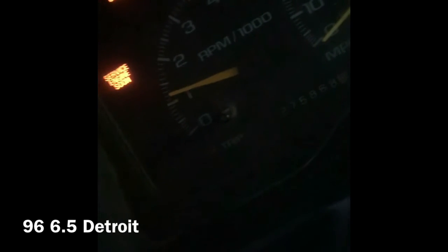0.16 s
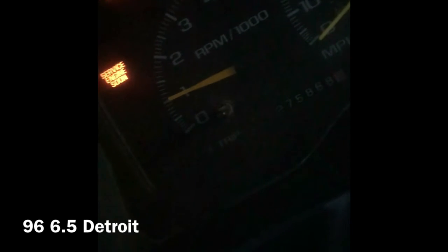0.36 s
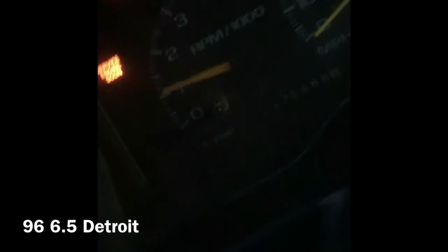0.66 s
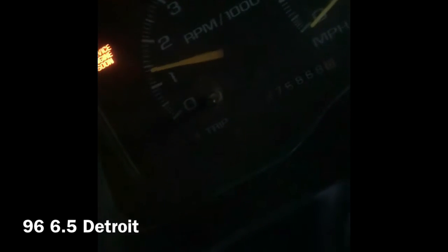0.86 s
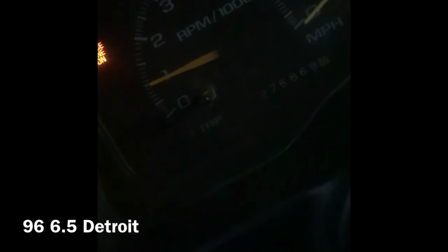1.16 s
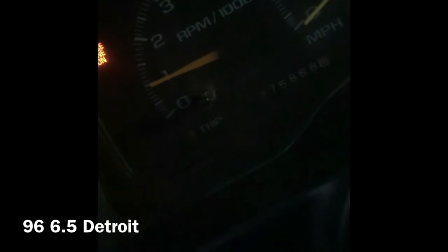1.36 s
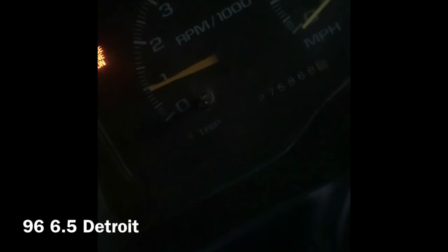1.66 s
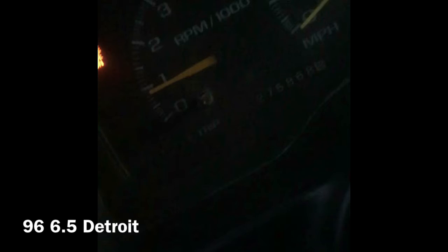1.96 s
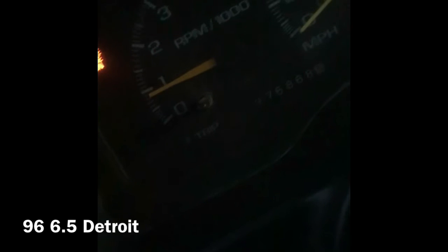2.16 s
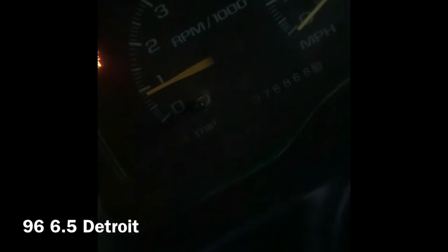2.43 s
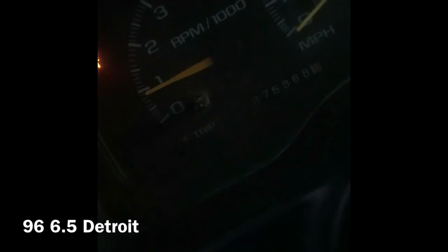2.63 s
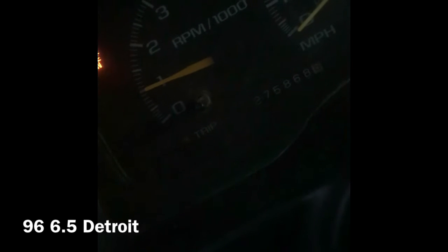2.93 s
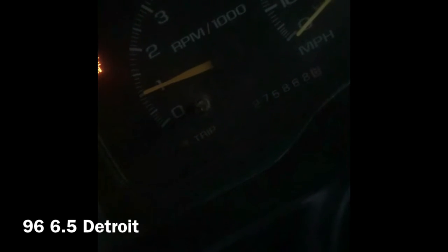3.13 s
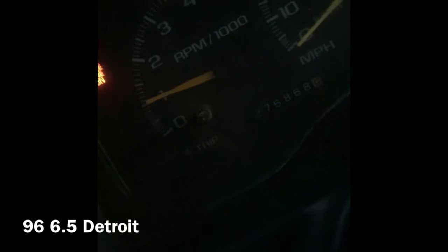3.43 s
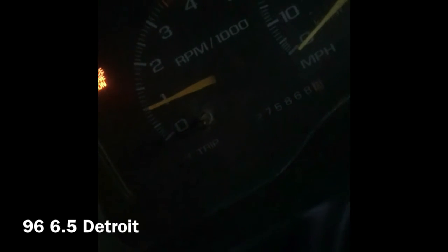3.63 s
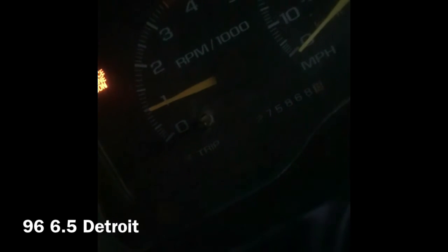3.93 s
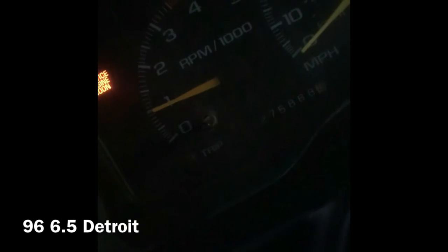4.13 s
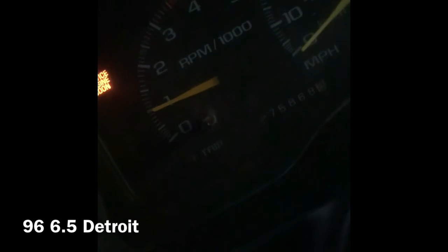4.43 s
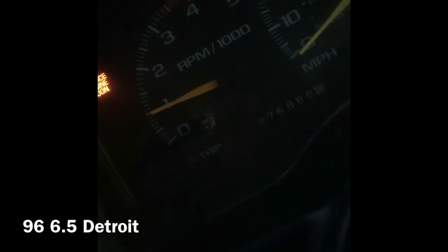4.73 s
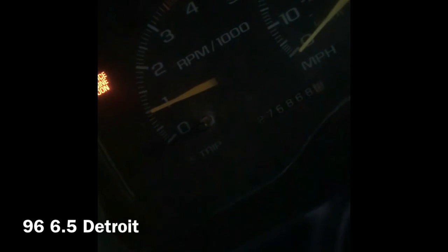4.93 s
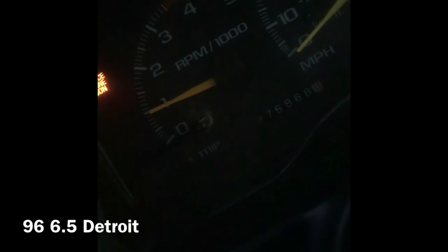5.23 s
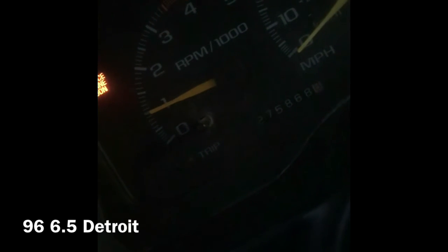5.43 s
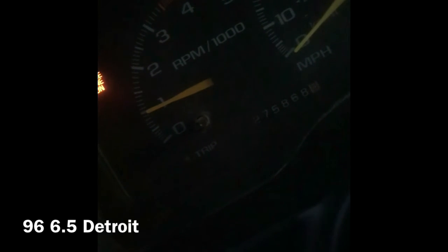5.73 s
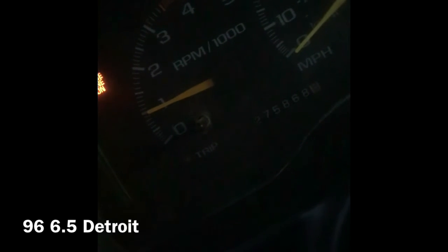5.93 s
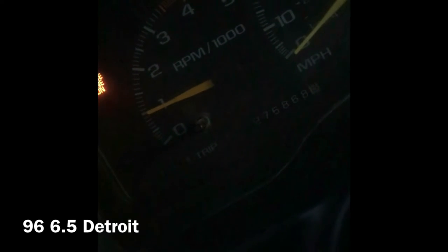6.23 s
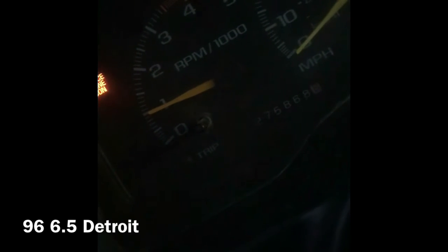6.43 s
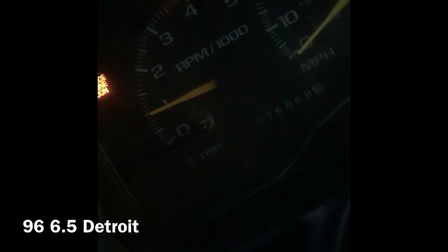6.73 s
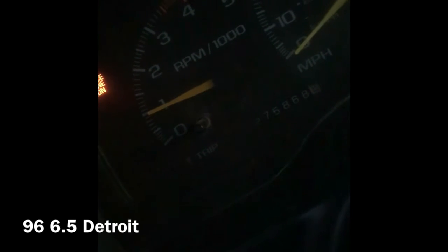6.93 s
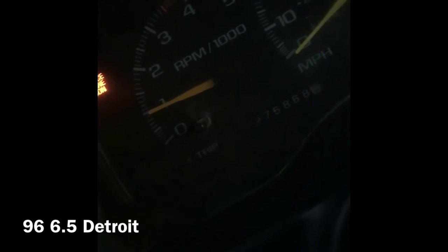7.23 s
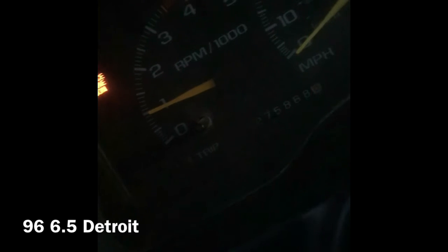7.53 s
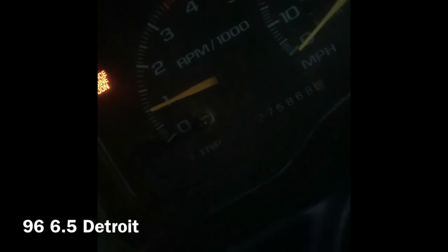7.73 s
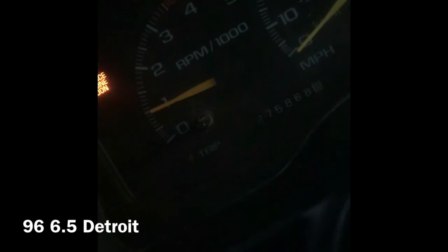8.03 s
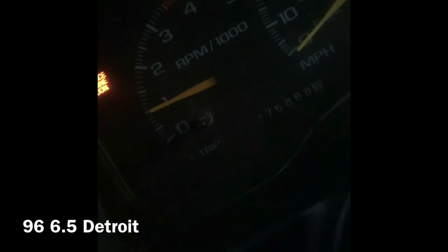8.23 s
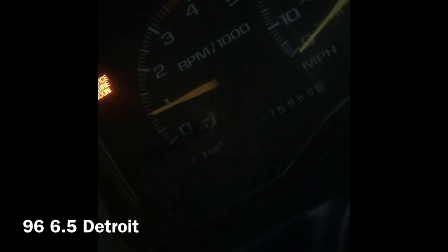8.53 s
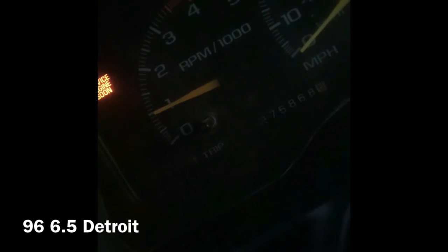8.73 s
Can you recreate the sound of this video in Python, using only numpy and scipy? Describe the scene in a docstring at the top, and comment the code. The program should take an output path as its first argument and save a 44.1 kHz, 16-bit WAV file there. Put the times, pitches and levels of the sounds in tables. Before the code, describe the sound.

Inside a truck cab, a just-started diesel stumbles and shudders, with a few metal clinks, before evening out into a booming, rhythmic idle.

```python
"""Cold V8 diesel, from the cab

The engine has just caught: it lopes, shudders, hunts for its speed and settles near 950 rpm.
Its low firing orders boom in the truck's cab over a loose rumble, and the same round of thuds, knocks
and ticks comes through the bulkhead every two turns. Dash trim buzzes with the shaking. Early on
a catch ratchets and loose metal clinks nearby. A faint hiss lies under it all."""
import sys
import numpy as np
from scipy import signal
from scipy.fft import rfft, irfft, next_fast_len
from scipy.io import wavfile
from scipy.ndimage import uniform_filter1d

SR = 44100
rng = np.random.default_rng(int(sys.argv[2]) if len(sys.argv) > 2 else 0)


def wav_out(sig):
    """Save sig, one row per channel (or a flat mono array), as 16-bit PCM at SR to the path in sys.argv[1]."""
    wavfile.write(sys.argv[1], SR, np.round(np.clip(np.atleast_2d(sig).T, -1, 1) * 32767).astype(np.int16))


N = 391166
TIME = np.arange(N) / SR

# faint hiss, up at the start and once more midway: t/s, level/dB
HISS_FADER = [(0, -65.5), (1.33, -64.5), (1.38, -73), (2.8, -76), (2.84, -64.5), (4.52, -65), (4.57, -74.5),
              (8.87, -74)]
# teeth of the ratcheting catch: t/s, level/dB
RATCHET_TEETH = [(.253, -17), (.275, -19), (0.292, -16), (0.308, -17.5), (.325, -18.5)]
# tone of a tooth: f/Hz, relative level/dB
TOOTH_EQ = [(250, -11), (600, 6), (950, 5.5), (1200, -16), (1650, 5.5), (2150, -13.5), (2950, 5), (3500, 0),
            (4200, -11), (7000, -18.5), (15500, -27.5)]
# touches of loose metal: t/s, ring level/dB, snap level/dB, tilt toward the high modes/(dB per kHz)
CLINK_HITS = [(0.575, -43, -25, 0), (0.657, -30, -22.5, 6), (.666, -27.5, -19, 6), (.704, -34, -22, 13),
              (0.916, -34, -35, 19), (1.025, -49, -39, 12), (1.037, -30.5, -33.5, 16),
              (1.091, -26, -19.5, -2), (1.097, -26, -19, -2), (4.991, -40, -42, 2)]
# modes of that metal: f/Hz, width/Hz, gain/dB
CLINK_MODES = [(2650, 70, -7), (2920, 35, 9.5), (3150, 39, 10.5), (3262, 30, 15), (3420, 90, 2),
               (3720, 160, -7), (4100, 200, -20)]
# tone of a clink's snap: f/Hz, relative level/dB
SNAP_EQ = [(200, -1), (500, 1), (1100, -5), (1700, -5), (2100, -13), (3200, -1.5), (4400, -24),
           (6000, -25.5), (8000, -41), (15500, -46)]
# the dash trim works loose and buzzes louder: start/s, end/s, boost/dB
LOOSE_TRIM_SPELLS = [(1.63, 1.86, 3), (2.36, 2.8, 8.5), (3.48, 3.66, 7), (4.0, 4.48, 6.5),
                     (4.98, 5.34, 10.5), (6.72, 7.24, 6.5), (7.74, 7.86, 9), (8.24, 8.36, 8)]
# swells of cab resonance: t/s, f/Hz, peak level/dB, rise/s, fall/s
CAB_SHUDDERS = [(.122, 50, -16, .03, 0.028), (0.237, 59.6, -2.5, 0.016, 0.03),
                (0.775, 124, -17, .02, 0.034), (.778, 216, -26, .025, .03), (0.803, 58.9, -6, 0.047, 0.13),
                (0.859, 170.5, -14, 0.022, 0.028), (0.957, 178, -19, 0.058, 0.038),
                (2.534, 54.3, -13, 0.023, 0.045), (2.897, 63, -13, 0.031, 0.059),
                (3.21, 50, -19, 0.028, 0.013), (3.322, 51, -13.5, 0.028, 0.013),
                (3.836, 60, -18, 0.014, 0.014)]
# tone of the rumble: f/Hz, relative level/dB
RUMBLE_EQ = [(20, -37), (36, -26.5), (47, -1.5), (57, 1), (75, 0), (105, -4), (145, -8.5), (168, -11),
             (205, -9.5), (250, -17), (400, -29.5), (800, -79.5)]

# crank speed: t/s, speed/rpm
CRANK_SPEED = [(0.0, 972.0), (0.3, 846.9), (0.6, 940.0), (1.1, 946.6), (1.6, 891.0), (2.05, 783.9),
               (2.35, 806.1), (2.7, 896.1), (3.0, 1032.6), (3.4, 1069.4), (3.7, 945.2), (4.1, 965.4),
               (5.0, 959.8), (5.8, 962.3), (6.2, 950.0), (6.9, 958.0), (7.4, 952.1), (8.87, 954.9)]
# the engine flares as the cylinders catch: start/s, end/s, strength (0-1)
FLARE_SPELLS = [(.07, .205, 1), (.505, .875, 0.67)]
# it misses and coasts: start/s, end/s, strength (0-1)
MISFIRE_SPELLS = [(.208, .25, 0.2), (.355, .47, 0.53), (.915, 1.085, 0.96), (1.16, 1.215, 0.47),
                  (1.44, 1.6, 0.22), (1.7, 1.75, 0.26), (1.84, 1.9, 0.4), (3.53, 3.69, 0.2)]
# the hardest firings: t/s, clatter boost/dB
BANGS = [(.095, -1.5), (.79, 2), (1.26, 8), (1.381, 2), (1.668, 1.5), (1.803, 1.5), (2.25, 2.5), (2.4, 2),
         (2.549, 4.5), (2.94, 1), (3.265, 1.5), (3.755, 3.5), (4.075, 2), (4.13, 4.5), (4.25, 1.5)]
# the eight cylinders in firing order: thud level/dB, knock level/dB, tick level/dB
CYLINDER_MIX = [(-5, -2.5, -2), (-5.5, -0.5, -4.5), (-7, -5.5, -3.5), (-5, -3, -3.5), (-8, -6.5, -3.5),
                (-7.5, -4, -3), (-9, -7, -5), (-7, -3.5, -6.5)]
# each cylinder's injector click, combustion and valve closing: crank angle/deg, level/dB
CYLINDER_HITS = [(-22, -5), (5, -3), (30, -3.5)]
# low, mid and high registers of an impact through the bulkhead: f/Hz, relative level/dB
THUD_EQ = [(100, -27), (170, -10), (210, -7), (270, -6.5), (380, -6), (470, -8.5), (540, -12.5), (700, -14),
           (1000, -39.5), (2000, -76.5)]
KNOCK_EQ = [(300, -26.5), (600, -4.5), (740, -5), (810, 2), (1000, 0), (1080, -2), (1140, 0.5),
            (1310, -1.5), (1480, -10.5), (1800, -20.5), (2600, -32.5), (5000, -75.5)]
TICK_EQ = [(700, -37), (1300, 4), (1700, 5.5), (2040, -0.5), (2250, 2.5), (2500, 2), (2850, 1.5),
           (3250, 0.5), (3550, -8), (4000, -19), (5000, -27.5), (6200, -30), (8000, -55.5), (16000, -60)]
# modes of block, covers and panels: f/Hz, width/Hz, boost/dB
BODY_MODES = [(331, 22, 1.5), (472, 17, 5.5), (564, 12, 4.5), (778.4, 17, 9.5), (840, 26, 1),
              (964, 15, 4.5), (1318, 14, 3), (1623, 20, 7), (1907, 22, 7.5), (2310, 37, 4), (3050, 54, 3.5),
              (3234, 38, 4)]
# pitched thumps, knocks and injector ticks of one cycle: crank angle/deg, f/Hz, decay/s, level/dB
RINGING_PARTS = [(58.1, 810, 0.0097, -37), (75.4, 1340, .014, -43.5), (103.26, 960, 0.014, -39.5),
                 (110.8, 1920, 0.0059, -43.5), (148.36, 805, 0.0037, -38.5), (171.5, 290, .008, -35.5),
                 (178.2, 965, 0.0066, -40.5), (208, 2080, 0.006, -45.5), (238, 1190, 0.014, -39.5),
                 (272.4, 333, 0.0073, -31.5), (279.8, 400, 0.014, -37), (290, 1090, 0.015, -37.5),
                 (317.4, 2360, .011, -41.5), (333, 1310, 0.0082, -39.5), (368, 1180, 0.011, -37),
                 (372, 1010, 0.007, -35.5), (376.5, 1470, .006, -44), (439.3, 213, 0.011, -28),
                 (464, 980, 0.013, -38), (491.6, 1320, 0.011, -42.5), (503, 840, .01, -37.5),
                 (622, 450, 0.008, -39), (628, 970, 0.011, -40.5), (650, 2350, 0.0091, -45)]
# firing orders: multiple of the cycle rate, level ahead of the cab EQ/dB
FIRING_ORDERS = [(5, -32.5), (6, -31), (7, -28), (8, -23.5), (9, -30.5), (10, -36.5), (11, -18.5),
                 (12, -34.5), (13, -31), (14, -35), (15, -32.5), (16, -26.5), (18, -48.5), (19, -32),
                 (20, -46), (22, -37.5), (23, -43.5), (24, -38), (26, -45.5), (28, -46), (40, -38.5),
                 (41, -47)]
# how the cab carries the bass: f/Hz, gain/dB
CAB_EQ = [(25, -27.5), (39, -6), (47, -15.5), (54, 5.5), (63, -0.5), (72, -7), (92, -5.5), (110, -7.5),
          (128, 0.5), (150, 2.5), (165, -2), (210, 6), (250, -7)]
# imbalance between cylinders, which feeds the orders beside the firing rate: t/s, boost/dB
CYLINDER_IMBALANCE = [(0, 3.5), (1.45, -5), (1.7, -2), (2.2, -3.5), (2.4, 0), (2.7, 0), (3.0, 1.5),
                      (4.0, 0), (8.87, -0.5)]


def from_db(db):
    return 10 ** (np.asarray(db) / 20)


def unit_rms(x):
    return x / np.sqrt(np.mean(x ** 2) + 1e-20)


def automation(points):
    """A breakpoint curve, sample by sample."""
    return np.interp(TIME, *np.transpose(points))


def eq_db(curve, hz):
    """Level of an EQ curve at these frequencies."""
    f, db = np.transpose(curve)
    return np.interp(np.log(hz + 1e-3), np.log(f), db)


def equalise(x, curve):
    """Minimum-phase EQ that keeps the power of white noise."""
    size = next_fast_len(N + SR // 2, True) * 2
    gain = unit_rms(from_db(eq_db(curve, np.arange(size // 2 + 1) * SR / size)))
    cepstrum = irfft(np.log(gain))
    cepstrum[1:size // 2] *= 2
    cepstrum[size // 2 + 1:] = 0
    return irfft(rfft(x, size) * np.exp(rfft(cepstrum)))[:N]


def resonance(x, hz, width):
    """Two-pole band-pass with unity gain at its peak."""
    r = np.exp(-np.pi * width / SR)
    feedback = [1, -2 * r * np.cos(2 * np.pi * hz / SR), r * r]
    return signal.lfilter(np.array([1, 0, -1]) * (1 - r * r) / 2, feedback, x + 1e-18)


def noise_band(size, hz, width):
    """Noise band-passed twice around one pitch."""
    return resonance(resonance(rng.standard_normal(size), hz, width), hz, width)


def hit_envelope(rise_s, decay_s, size=3000):
    """A quick attack and an exponential tail."""
    t = TIME[:size]
    return (1 - np.exp(-t / rise_s)) * np.exp(-t / decay_s)


def add(out, s, piece):
    """Mix a short piece in at time s."""
    i = int(round(s * SR))
    if -len(piece) < i < N:
        out[max(i, 0):i + len(piece)] += piece[max(-i, 0):N - i]


def bursts(times, levels_db, envelope):
    """One noise burst for each hit."""
    out = np.zeros(N)
    for s, db in zip(times, levels_db):
        add(out, s, from_db(db) * envelope * rng.standard_normal(len(envelope)))
    return out


def spells(rows, edge_s):
    """Each spell fades in, holds its strength and fades out."""
    return sum(strength * (np.tanh((TIME - start) / edge_s) - np.tanh((TIME - end) / edge_s)) / 2
               for start, end, strength in rows)


def coldness(warm_up_s=6.8):
    """1 at the start, falling toward 0 as the chambers warm."""
    return np.exp(-TIME / warm_up_s)


def hiss():
    """A faint bed of white noise that is up twice and sinks back."""
    return from_db(automation(HISS_FADER)) * rng.standard_normal(N)


def ratchet():
    """A catch slips over its teeth, one bright click each."""
    times, levels_db = np.transpose(RATCHET_TEETH)
    return equalise(bursts(times, levels_db, hit_envelope(0.0023, 0.0098)), TOOTH_EQ)


def clinks(pivot_hz=3300):
    """Loose metal lands with a hard snap and a brief chatter that rings its modes."""
    times, ring_db, snap_db, tilt_db = np.transpose(CLINK_HITS)
    ring = np.zeros(N)
    for hz, width, db in CLINK_MODES:
        chatter_db = ring_db + tilt_db * (hz - pivot_hz) / 1000
        chatter = bursts(times, chatter_db, hit_envelope(0.0005, 0.006))
        ring += from_db(db + 15) * resonance(chatter, hz, width)
    muffled = signal.sosfilt(signal.butter(4, [2400, 4400], "band", fs=SR, output="sos"), ring)
    snaps = bursts(times, snap_db, hit_envelope(0.0008, 0.012))
    return muffled + equalise(snaps, SNAP_EQ)


def trim_buzz(cycle, shake_deg=590, width_deg=170):
    """Plastic dash trim rasps once a cycle, louder when the engine is cold or the trim works loose."""
    shake_phase = cycle - shake_deg / 720
    nearest = np.round(shake_phase).astype(int)
    shake = np.exp(-((shake_phase - nearest) * 720 / width_deg) ** 2)
    scatter_db = rng.standard_normal(nearest[-1] - nearest[0] + 1)[nearest - nearest[0]]
    level_db = -72.5 + 5 * coldness() + spells(LOOSE_TRIM_SPELLS, edge_s=0.02) + scatter_db
    rasp = unit_rms(noise_band(N, hz=4280, width=700))
    high_rasp = unit_rms(noise_band(N, hz=5260, width=750))
    first_flare = spells(FLARE_SPELLS[:1], edge_s=0.02)
    return from_db(level_db) * shake * rasp + from_db(-61) * first_flare * high_rasp


def shudders():
    """The engine rocks on its mounts and the cab rings in short, low swells."""
    out = np.zeros(N)
    for s, hz, db, rise_s, fall_s in CAB_SHUDDERS:
        t = TIME - s
        swell = np.exp(-(t / np.where(t < 0, rise_s, fall_s)) ** 2)
        out -= from_db(db) * swell * np.cos(2 * np.pi * hz * t)
    return out


def effort(rpm, speed_db, pull_db, cold_db, flare_db, misfire_db, idle_rpm=955):
    """A layer's gain ride in dB against the warm idle."""
    overspeed = (rpm - idle_rpm) / 100  # in 100 rpm
    pull = uniform_filter1d(np.gradient(overspeed) * SR, size=SR // 5)  # in 100 rpm per second
    flares = flare_db * spells(FLARE_SPELLS, edge_s=0.0043)
    misfires = misfire_db * spells(MISFIRE_SPELLS, edge_s=0.036)
    return speed_db * overspeed + pull_db * pull + cold_db * coldness() + flares + misfires


def rumble(clatter_db):
    """Irregular low end that follows the clatter and eases as the engine warms."""
    level_db = -31.5 + 10.4 * coldness() + 0.53 * clatter_db
    return from_db(level_db) * unit_rms(equalise(rng.standard_normal(N), RUMBLE_EQ))


def firing_accents(cycle, lope_deg=400, lope_db=2.2):
    """Clatter accents in dB: a cold lope toward the hardest-burning cylinder, and single bangs."""
    lope = np.cos(2 * np.pi * (cycle - lope_deg / 720))
    bangs_db = sum(db * np.exp(-((TIME - s) / 0.028) ** 2) for s, db in BANGS)
    return lope_db * coldness() * lope + bangs_db


def ringing_parts(cycle, note_share=0.77, scatter_db=0.6, jitter_s=0.00012):
    """Each part is struck at its own crank angle every cycle and rings its note, roughened by grit."""
    t = TIME[:SR // 14]
    cycles, out = np.arange(int(cycle[-1]) + 2), np.zeros(N)
    for degrees, hz, decay_s, db in RINGING_PARTS:
        times = np.interp(cycles + degrees / 720, cycle[::100], TIME[::100], right=2 * N / SR)
        envelope = hit_envelope(0.0032, decay_s, size=len(t))
        envelope /= envelope.max()
        note = np.sqrt(2 * note_share) * np.sin(2 * np.pi * hz * t)
        grits = noise_band((len(times), len(t)), hz, width=0.24 * hz)
        for s, grit, (late, hard) in zip(times, grits, rng.standard_normal((len(times), 2))):
            hit = envelope * (note + np.sqrt(1 - note_share) * unit_rms(grit))
            add(out, s + jitter_s * late, from_db(db + scatter_db * hard) * hit)
    return out


def impacts(cycle, levels_db, eq, rise_s, decay_s, repeat, scatter_db, jitter_s):
    """One register of clatter at rms 1: each hit's signature returns every cycle with fresh grit."""
    envelope = hit_envelope(rise_s, decay_s)
    cycles, out = np.arange(-1, int(cycle[-1]) + 2), np.zeros(N)
    # the crank is already turning, so its clock reaches back one cycle
    first_period_s = 1 / (SR * (cycle[1] - cycle[0]))
    clock_cycle, clock_s = np.r_[cycle[0] - 1, cycle[::100]], np.r_[-first_period_s, TIME[::100]]
    for cylinder, cylinder_db in enumerate(levels_db):
        for degrees, hit_db in CYLINDER_HITS:
            place = (90 * cylinder + degrees) / 720
            times = np.interp(cycles + place, clock_cycle, clock_s, right=2 * N / SR)
            signature = np.sqrt(repeat) * rng.standard_normal(len(envelope))
            for s, (late, hard) in zip(times, rng.standard_normal((len(times), 2))):
                grit = np.sqrt(1 - repeat) * rng.standard_normal(len(envelope))
                gain = from_db(cylinder_db + hit_db + scatter_db * hard)
                add(out, s + jitter_s * late, gain * envelope * (signature + grit))
    return unit_rms(equalise(out, eq))


def clatter(cycle, drive_db):
    """Injectors, combustion and valves thud, knock and tick, ringing the block, covers and panels."""
    thud_db, knock_db, tick_db = np.transpose(CYLINDER_MIX)
    thud = impacts(cycle, thud_db, THUD_EQ, rise_s=0.00054, decay_s=0.0074,
                   repeat=0.65, scatter_db=0.73, jitter_s=0.00008)
    knock = impacts(cycle, knock_db, KNOCK_EQ, rise_s=0.00051, decay_s=0.013,
                    repeat=0.49, scatter_db=1.0, jitter_s=0.00007)
    tick = impacts(cycle, tick_db, TICK_EQ, rise_s=0.0006, decay_s=0.02,
                   repeat=0.31, scatter_db=2.5, jitter_s=0.00006)
    cold_bite_db = 2.6 * np.exp(-(TIME / 4.1) ** 2)  # the harshest ticking fades as the chambers warm
    hits = from_db(-36.5 + 0.6 * drive_db) * thud + from_db(-39 + drive_db) * knock
    hits += from_db(-44.5 + drive_db + cold_bite_db) * tick
    body_ring = sum((from_db(db) - 1) * resonance(hits, hz, width) for hz, width, db in BODY_MODES)
    return hits + body_ring


def firing_boom(cycle, rpm, crossover_hz=105):
    """Clean harmonics of the engine cycle fill the cab: boom below the crossover, drone above."""
    boom_db = effort(rpm, speed_db=-0.5, pull_db=-0.2, cold_db=-5.5, flare_db=-3, misfire_db=-8.5)
    drone_db = effort(rpm, speed_db=-1.7, pull_db=0, cold_db=-6, flare_db=-4.5, misfire_db=1.5)
    imbalance_db = automation(CYLINDER_IMBALANCE)
    out = np.zeros(N)
    for order, db in FIRING_ORDERS:
        hz = order * rpm / 120
        lag_turns = order * (0.746 - 0.034 * order)  # frame and cab hold the low orders back longest
        # even firing puts the boom into order 8, the firing rate, and takes it from the others
        low_db = boom_db + (-0.25 * imbalance_db if order == 8 else imbalance_db)
        ride_db = low_db + (drone_db - low_db) / (1 + (crossover_hz / hz) ** 8)
        gain = from_db(db + eq_db(CAB_EQ, hz) + ride_db)
        out += gain * np.sin(2 * np.pi * (order * cycle - lag_turns))
    return np.sqrt(2) * out


def engine(start_deg=-144):
    """One crank drives rumble, clatter, ringing parts, trim buzz and boom."""
    rpm = automation(CRANK_SPEED)
    cycle = start_deg / 720 + np.cumsum(rpm / 120) / SR  # one cycle is two turns, 720 degrees
    clatter_db = effort(rpm, speed_db=1.06, pull_db=0.19, cold_db=1.78, flare_db=6, misfire_db=-13)
    drive_db = clatter_db + firing_accents(cycle)
    noise_layers = rumble(clatter_db) + clatter(cycle, drive_db)
    pings = from_db(-1 + 0.67 * drive_db) * ringing_parts(cycle)
    return noise_layers + pings + trim_buzz(cycle) + firing_boom(cycle, rpm)


def scene():
    """Hiss, engine and cab noises, mixed in mono."""
    return (hiss() + engine() + shudders() + ratchet() + clinks())[None]


def record(dry, cutoff_hz=15750):
    """A steep high cut on the mix."""
    return signal.sosfilt(signal.ellip(10, 0.1, 80, cutoff_hz, fs=SR, output="sos"), dry)


dry = scene()
out = record(dry)
wav_out(out)
```